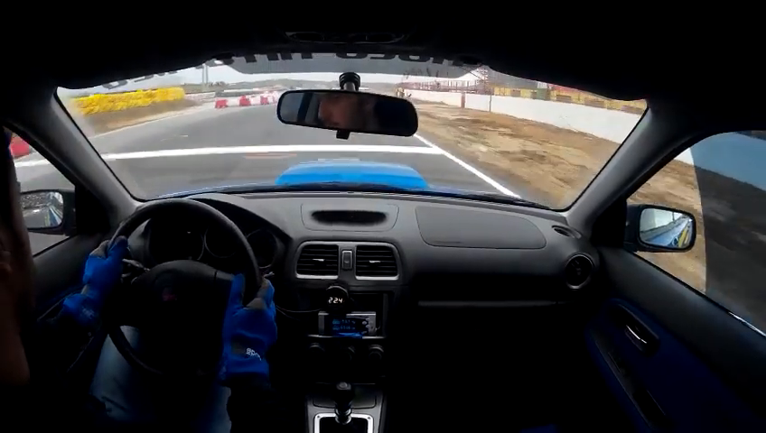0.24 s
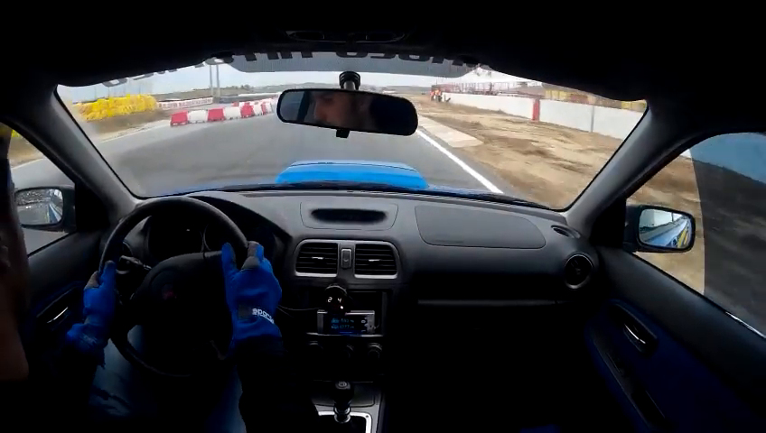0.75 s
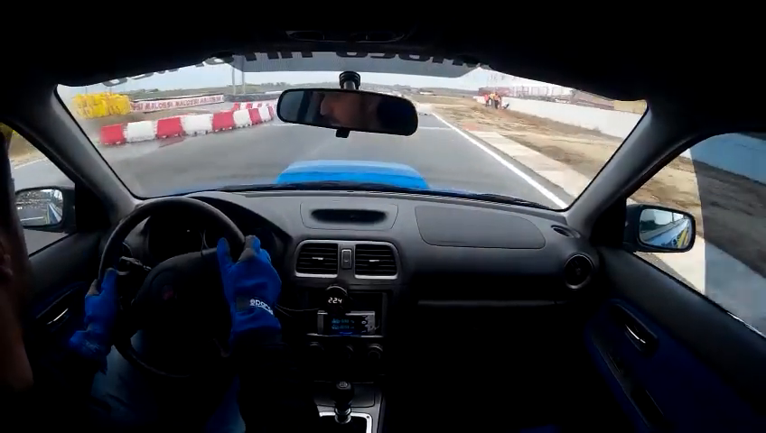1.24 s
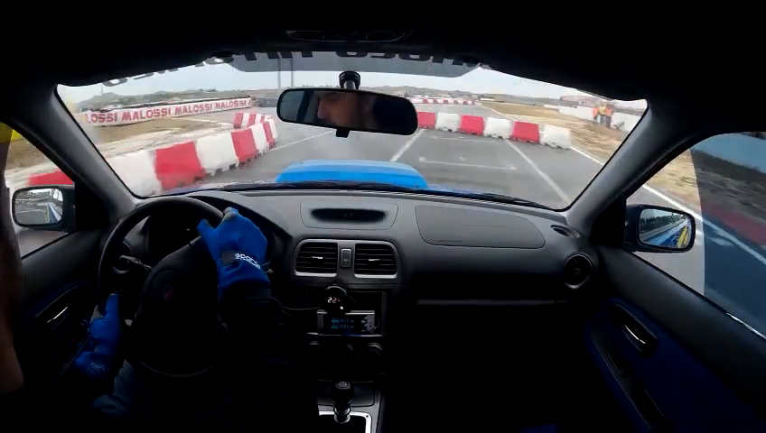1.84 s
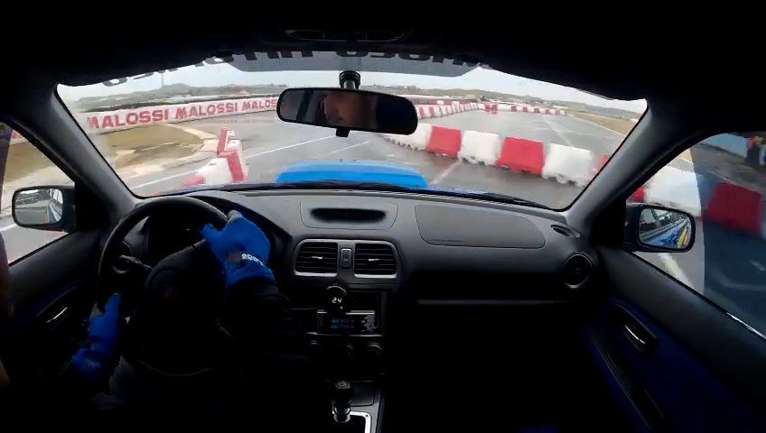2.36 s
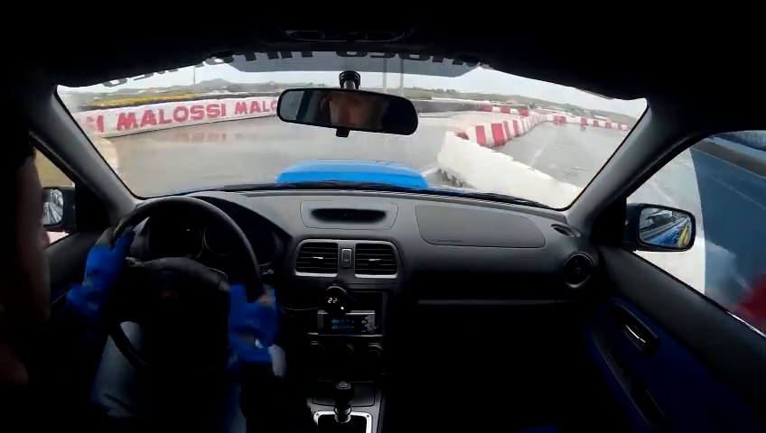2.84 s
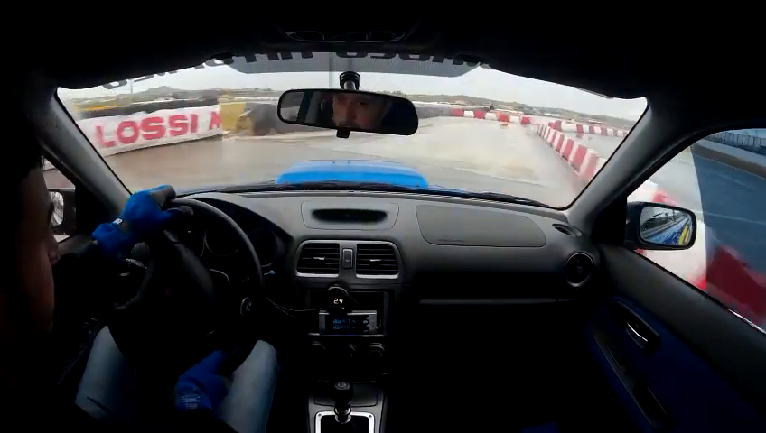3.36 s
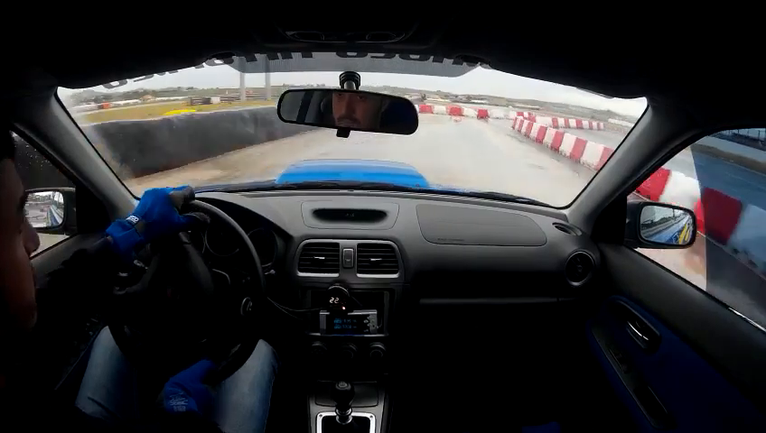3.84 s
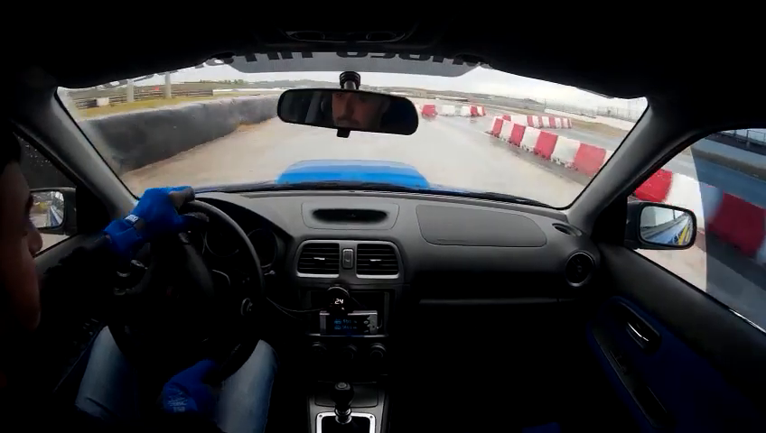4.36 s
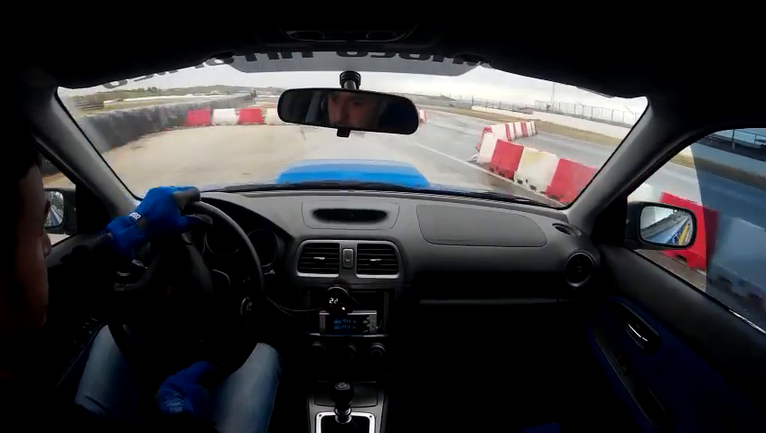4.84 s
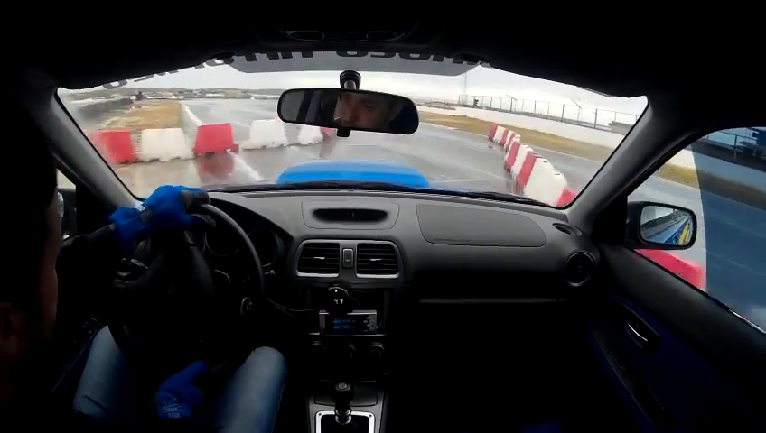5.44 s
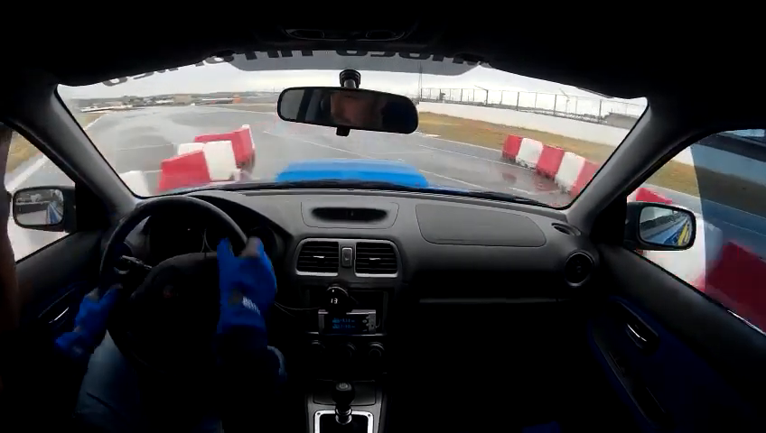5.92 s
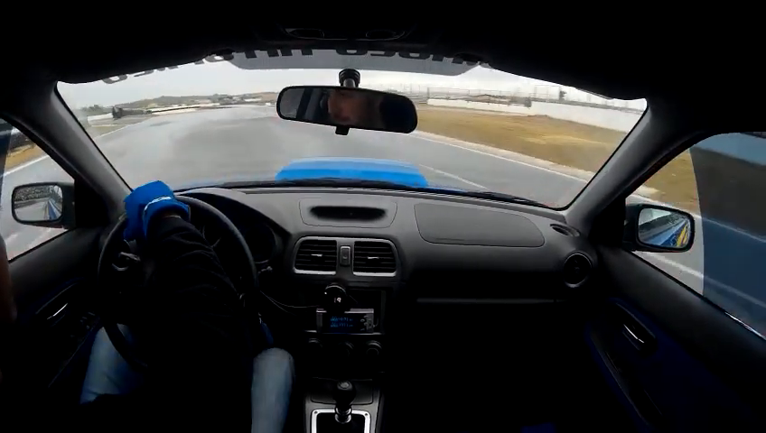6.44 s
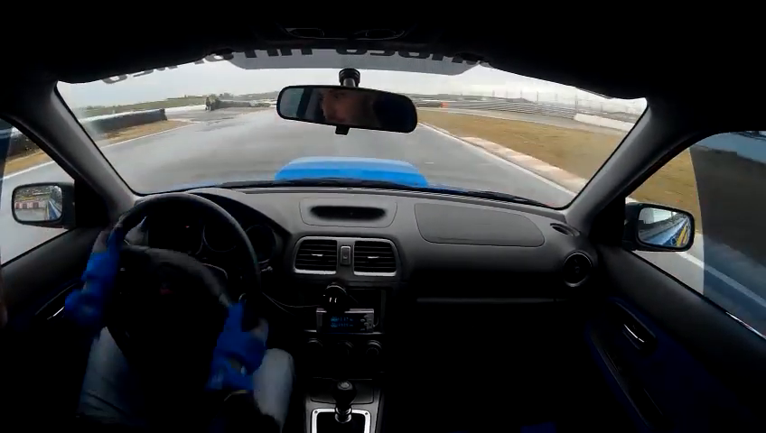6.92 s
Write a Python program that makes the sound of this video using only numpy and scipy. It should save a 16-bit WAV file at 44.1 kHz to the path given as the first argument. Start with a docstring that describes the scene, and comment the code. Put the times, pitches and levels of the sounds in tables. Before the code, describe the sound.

Inside a car on a bumpy track, a throbbing engine eases off and accelerates again amid deep road rumble and clacking trim.

```python
"""Inside a flat-four rally car on a wet road. It starts on the throttle, the exhaust booming in the
cabin over tyre rumble, then lifts off and the revs sink while bumps knock the loose trim.
Around 4 s the roughest stretch sets the trim chattering and grit ticks against the body.
After 5 s the car pulls away, the engine growls as the throttle opens, and near 7 s puddles
spray the wheel arches."""
import sys
import numpy as np
from scipy import signal
from scipy.fft import rfft, irfft, next_fast_len
from scipy.io import wavfile
from scipy.ndimage import uniform_filter1d, map_coordinates

SR = 44100
rng = np.random.default_rng(int(sys.argv[2]) if len(sys.argv) > 2 else 0)


def int16_out(signal):
    """Quantize to a 16-bit WAV file."""
    q = np.round(np.clip(np.atleast_2d(signal).T, -1, 1) * 32767)
    wavfile.write(sys.argv[1], SR, q.astype(np.int16))


N = 316638


def amp(db):
    """Decibels to gain."""
    return np.exp(np.asarray(db) * (np.log(10) / 20))


def unit(x):
    """Scale to rms 1."""
    return x / np.sqrt(np.mean(x ** 2) + 1e-20)


def automation(rows):
    """Draw (t/s, value) breakpoints as one value per sample."""
    return np.interp(np.arange(N) / SR, *np.transpose(rows))


def along(points, hz):
    """Read (f/Hz, value) points on a log frequency axis."""
    f, value = np.transpose(points)
    return np.interp(np.log(hz), np.log(f), value)


def swell(s, half_s):
    """A bell-shaped envelope of height 1 around a moment."""
    return np.exp(-((np.arange(N) / SR - s) / half_s) ** 2)


def wobble(rate):
    """Smooth random modulation, rate knots a second."""
    knots = rng.standard_normal(int(N * rate / SR) + 4)
    coarse = np.arange(0, N + 20, 20)
    smooth = map_coordinates(knots, [coarse * rate / SR])
    return np.interp(np.arange(N), coarse, smooth)


def response(points, size):
    """Minimum-phase impulse response of an EQ curve of (f/Hz, level/dB) points."""
    gain = amp(along(points, np.fft.rfftfreq(size, 1 / SR) + 1))
    cepstrum = irfft(np.log(gain))
    cepstrum[1:size // 2] *= 2
    cepstrum[size // 2 + 1:] = 0
    return irfft(np.exp(rfft(cepstrum)))


def colour(x, points):
    """Pass a sound through a body with this EQ curve."""
    return signal.oaconvolve(x, response(points, size=16384))[:len(x)]


def noise(points):
    """Coloured noise of rms 1."""
    return unit(colour(rng.standard_normal(N), points))


def even(x, seconds):
    """Level out the slow swells of a noise and keep its fast flutter."""
    power = np.abs(uniform_filter1d(x ** 2, int(seconds * SR / 2) + 1))
    return unit(x / np.sqrt(uniform_filter1d(power, int(seconds * SR) + 1) + 1e-9))


def add(track, s, sound):
    """Mix a sound in at a time."""
    part = track[max(round(s * SR), 0):][:len(sound)]
    part += sound[:len(part)]


def contact(points, scrape, t60):
    """A hit that scrapes in and out of touch, coloured by what is struck; peak 1."""
    t = np.arange(SR // 20) / SR
    force = scrape * rng.standard_normal(len(t)) * amp(-60 * t / t60) * (1 - np.exp(-t / .0012))
    force[round(.0008 * SR)] += 1  # the main transient
    ring = signal.fftconvolve(force, response(points, size=2048))
    return ring / np.abs(ring).max()


# roughness of the ride: t/s, level/dB
ROUGHNESS = [(0, 8), (.35, -6), (.8, -6.5), (1.5, -7), (2.2, -8), (2.8, -10.5), (3.2, -9.5), (3.45, -5),
             (3.65, -2.5), (4.45, 3), (4.75, -1), (5.55, -1), (5.97, -10.5), (6.25, 0.5), (6.65, -2),
             (7.18, 4)]
# bumps under the wheels: t/s, floor drum swell/dB, rumble swell/dB, body shake swell/dB
BUMPS = [(.04, -10, 0.5, -1), (.15, 2, -11, 8), (.6, -10, 7.5, 10), (.98, 12, 0, 3.5), (1.78, 9.5, 0, -2),
         (2.03, 9.5, -0.5, -0.5), (2.22, 9, 0.5, -4), (3.94, 5.5, 3, 5), (4.26, 8, -6, -3),
         (4.48, 3, 6, 1.5), (4.92, 6.5, 1.5, -2.5), (5.34, 1, 2, 3.5), (5.69, 8, 2.5, -0.5),
         (6.45, 5.5, -7, -1), (6.8, 3.5, 9.5, -2.5), (7.019, 4.5, -3.5, -6)]
def ride():
    """The road surface as level rides in dB: its roughness, and three lanes of swells from the bumps."""
    bumps_db = sum(np.outer(swell_db, swell(s, half_s=.075)) for s, *swell_db in BUMPS)
    return automation(ROUGHNESS), bumps_db


# EQ of the floor drum, cabin rumble, higher air modes and body shake: f/Hz, level/dB
FLOOR_EQ = [(15, -39), (35, -16.5), (54, -17.5), (67, -5.5), (79, 2.5), (90, -3.5), (110, -23.5),
            (160, -31), (250, -43.5), (900, -110)]
RUMBLE_EQ = [(30, -48), (70, -23.5), (85, -3.5), (95, 2), (110, 3), (127, -1.5), (147, -14), (190, -28),
             (250, -37.5), (900, -110)]
AIR_EQ = [(110, -42.5), (150, -10), (169, 3.5), (187, -7.5), (207, 1), (225, -8), (250, -21), (330, -44.5),
          (900, -100)]
SHAKE_EQ = [(8, -25), (17, -7), (24, 0), (31, -12), (50, -25), (200, -100)]
def road(ride_db, bumps_db):
    """The low bed: tyres drum the floor and drive the cabin's air; the body shakes on its springs."""
    drum_db, rumble_db, shake_db = ride_db + bumps_db
    drum = amp(-30 + drum_db) * even(noise(FLOOR_EQ), seconds=.13)
    rumble = amp(-28 + rumble_db) * even(noise(RUMBLE_EQ), seconds=.1)
    air = amp(-41.5 + .56 * rumble_db) * even(noise(AIR_EQ), seconds=.25)  # swells less than the rumble
    shake = amp(-41.5 + shake_db) * even(noise(SHAKE_EQ), seconds=.32)
    return drum + rumble + air + shake


# puddle cues: t/s, length/s, level/dB
PUDDLES = [(6.775, .045, -71), (6.816, .075, -53), (7.078, .04, -67), (7.106, .044, -57)]
# EQ of water on the wheel arches: f/Hz, level/dB
WATER_EQ = [(900, -20.5), (1700, 7.5), (2400, -3), (3200, -1), (4200, -2), (5200, -9), (6500, -9.5),
            (8300, -19.5), (9500, -27), (12000, -27), (15000, -46)]
def spray(gain_db=1.5, attack_s=.014, t60=.06):
    """Each puddle throws a short burst of clumped drops into the wheel arches."""
    t = np.arange(N) / SR
    bursts = np.zeros(N)
    for s, length, db in PUDDLES:
        attack = np.clip((t - s) / attack_s, 0, 1)
        release_db = -60 * np.maximum(t - s - length, 0) / t60
        bursts += attack * amp(db + release_db)
    clumps = amp(4.5 * wobble(600))
    return amp(gain_db) * bursts * unit(noise(WATER_EQ) * clumps)


# stone hits: t/s, level/dB
STONES = [(4.0288, -58.5), (4.0784, -48.5), (4.309, -56), (4.3334, -54.5), (4.345, -51.5), (4.3581, -53.5),
          (4.4703, -50), (5.989, -48)]
# EQ of a stone's tick: f/Hz, level/dB
TICK_EQ = [(500, -14.5), (1000, -0.5), (1700, 11), (2300, 1.5), (2900, 2.5), (4200, -1.5), (5300, -7.5),
           (6500, -10.5), (8500, -16.5), (13000, -37)]
def grit(gain_db=6):
    """Small stones tick against the body."""
    out = np.zeros(N)
    for s, db in STONES:
        add(out, s - .0008, amp(db + gain_db) * contact(TICK_EQ, scrape=.95, t60=.018))
    return out


# modes of the panel behind the trim: f/Hz, level/dB, t60/s
PANEL_MODES = [(238, 12.5, 0.015), (346, 5, 0.028), (434, -1, 0.068), (514, 1, 0.06), (567, 1.5, 0.054),
               (863, -12, 0.1)]
def panel_thud(attack_s=.0015):
    """The heavy panel takes a moment to get moving, then rings out in its damped modes."""
    t = np.arange(SR // 10) / SR
    ring = 0
    for hz, db, t60 in PANEL_MODES:
        decay = amp(db + rng.normal(0, .74) - 60 * t / t60)
        ring += decay * np.sin(2 * np.pi * (hz * t + rng.random()))
    return ring * (1 - np.exp(-(t / attack_s) ** 2))


# trim knocks: t/s, clack level/dB, thud level/dB
KNOCKS = [(0.094, -49.5, -52), (0.1419, -46, -41), (.172, -53, -39.5), (0.599, -37, -36.5),
          (0.8589, -47.5, -41), (0.9602, -49.5, -38), (.9865, -46, -43.5), (1.0324, -44.5, -41),
          (2.0473, -49, -33.5), (2.8556, -47, -52), (2.888, -55, -53.5), (3.0655, -48.5, -47),
          (3.0797, -50.5, -41.5), (3.8158, -53, -42), (3.8251, -33, -35.5), (3.901, -41, -39.5),
          (4.0033, -44.5, -39), (4.0289, -37.5, -39.5), (4.0568, -49, -40.5), (4.15, -33, -33),
          (4.157, -37.5, -47), (4.1742, -46, -38), (4.1907, -43, -39), (4.2103, -34, -36.5),
          (4.2744, -44.5, -42), (4.2864, -41.5, -34), (4.3189, -40.5, -40), (4.337, -45, -42.5),
          (4.3875, -46, -53), (4.4176, -41, -35.5), (4.4323, -26, -27), (4.4669, -37.5, -38),
          (4.4845, -28, -28), (4.5298, -43, -39.5), (4.7119, -43.5, -35.5), (4.7813, -44.5, -39.5),
          (4.998, -38, -33), (5.4118, -48, -48), (6.0828, -50, -49), (6.782, -42.5, -30.5)]
def trim_hits(rebound_over_db=-32, rebound_s=.014, loss_db=7.5, chatter_per_s=34):
    """Cue list for the trim: knocks, rebounds of the hard ones, and chatter on the roughest stretch."""
    rebounds = [(s + rebound_s, db - loss_db, thud_db - loss_db)
                for s, db, thud_db in KNOCKS if db > rebound_over_db]
    chatter = []
    for s in np.arange(3.8, 4.7, 1 / chatter_per_s):
        late, accent = rng.standard_normal(2)
        chatter.append((s + late / chatter_per_s / 2, -50.5 + 1.4 * accent, -47 + 1.4 * accent))
    return KNOCKS + rebounds + chatter


# EQ of the trim's clack: f/Hz, hard-hit level/dB, soft-hit level/dB
TRIM_EQ = [(250, -16.5, -13.5), (526, -16.5, -6.5), (705, -31, -19.5), (820, -29, -3), (996, -26, -19.5),
           (1170, -9.5, 1), (1350, -15.5, -6.5), (1615, 3, -1.5), (1580, 4, 0.5), (1770, 5.5, 2),
           (2080, -20, -19), (2430, -24.5, -26), (2800, -23, -28.5), (3840, -26.5, -30.5),
           (4540, -32.5, -38), (5100, -49, -50.5), (12000, -80, -88.5)]
def loose_trim(soft_db=-44, hard_db=-27):
    """Loose trim clacks and bounces, brighter when hit harder, and the panel behind it thuds."""
    out = np.zeros(N)
    hz, hard_eq, soft_eq = np.transpose(TRIM_EQ)
    for s, db, thud_db in trim_hits():
        hard = np.clip((db - soft_db) / (hard_db - soft_db), 0, 1)
        spot_db = 1.1 * rng.standard_normal(len(hz))  # each hit lands on another spot
        eq = np.c_[hz, hard * hard_eq + (1 - hard) * soft_eq + spot_db]
        add(out, s - .0008, amp(db + 4) * contact(eq, scrape=.61, t60=.02))
        bounce_s = rng.uniform(.0022, .0065)
        add(out, s + bounce_s, amp(db - 7) * contact(eq, scrape=.32, t60=.023))
        add(out, s - .001, amp(thud_db - 3) * panel_thud())
    return out


# the engine's firing rate: t/s, f/Hz
REVS = [(0, 172), (.15, 169), (.29, 186), (.42, 180), (.58, 167), (.72, 166), (1.0, 158), (1.12, 135),
        (1.7, 122.5), (2.9, 116), (3.8, 111), (4.2, 110), (5.1, 100.5), (5.8, 107.5), (6, 111.5),
        (6.55, 132), (6.9, 148.5), (7.18, 152)]
def firings():
    """Firing rate in Hz, and a running count of firings that wavers slightly with the crank speed."""
    rate = automation(REVS)
    return rate, np.cumsum(rate * (1 + .003 * wobble(25))) / SR


# accent of each of the four firings in a cycle: relative gain
CYLINDERS = [2.2, 2.5, 0.25, 1]
def firing_pulses(count, far_delay_s=.0013):
    """One uneven click per firing; one bank's pulses travel down a longer pipe and arrive late."""
    at = np.flatnonzero(np.diff(np.floor(count)))
    pulses = np.zeros(N)
    pulses[at] = np.resize(CYLINDERS, len(at)) * amp(3.5 * rng.standard_normal(len(at)))
    far_bank = np.floor(count) % 4 < 2
    return pulses * ~far_bank + np.roll(pulses * far_bank, round(far_delay_s * SR))


# EQ of the cabin's resonances and of the path through the bulkhead: f/Hz, level/dB
CABIN_EQ = [(170, -27.5), (240, -8), (290, -0.5), (380, 4), (440, 0), (510, 4), (600, -1), (680, -16.5),
            (740, -15), (820, -9.5), (890, -14.5), (980, -28.5), (1200, -53.5), (3000, -110)]
BULKHEAD_EQ = [(850, -42.5), (1030, -14), (1130, -6), (1230, 5), (1370, -7.5), (1520, -1.5), (1650, -2.5),
               (1790, 1.5), (1930, -6.5), (2080, -18.5), (2500, -23.5), (5000, -47.5), (9000, -100)]
def roar(count, throttle, ride_db):
    """Firing pulses and tyre noise roar in the cabin and rasp through the bulkhead."""
    roar_db = -50.5 + 4.5 * throttle ** 2 + .5 * ride_db
    rasp_db = -66 + 7 * throttle ** 2 + .5 * ride_db
    pulse_share = .051 + .22 * throttle
    pulses = firing_pulses(count)

    def through(eq):
        return np.sqrt(pulse_share) * unit(colour(pulses, eq)) + np.sqrt(1 - pulse_share) * noise(eq)
    return amp(roar_db) * through(CABIN_EQ) + amp(rasp_db) * through(BULKHEAD_EQ)


# higher engine orders: multiple of the firing rate, level/dB
ORDERS = [(1.5, 5), (2, -6), (2.5, -7), (3, -3), (3.5, -2.5), (4, -0.5), (4.5, -5), (5, -1), (5.25, -4),
          (5.5, 0.5), (5.75, -3), (6, 6.5), (6.5, -2), (7, -1.5), (8, -0.5), (8.5, -3.5), (9, -4),
          (10, -10), (11, -10), (12, -9.5)]
def growl(count, throttle, coasting_db=-65, throttle_db=20.5):
    """Throttle brings out the higher orders; they flutter and sweep through the cabin's resonances."""
    orders = 0
    for multiple, db in ORDERS:
        flutter_db = 3.2 * wobble(35)
        phase = 2 * np.pi * (multiple * count + rng.random()) + 1.05 * wobble(45)
        orders += amp(db + flutter_db) * np.sin(phase)
    inside = colour(orders, CABIN_EQ) + amp(-9.5) * colour(orders, BULKHEAD_EQ)
    return amp(coasting_db + throttle_db * throttle) * unit(inside)


# how the cabin's standing waves favour an exhaust note: f/Hz, level/dB
BOOM_EQ = [(100, -32), (105, -27), (110, -33.5), (113.3, -27.5), (115, -25), (117, -30), (118.5, -33.5),
           (123, -32.5), (135, -39), (150, -48), (160, -30.5), (168, -28), (185, -34.5), (200, -47),
           (207, -40.5), (215, -39.5), (222, -55.5), (245, -67.5), (295, -61), (330, -74)]
# brief dips in the exhaust's fundamental: t/s, half width/s, depth/dB
DIPS = [(.19, 0.092, 12), (.83, 0.13, 17.5), (1.1, 0.037, 3), (1.575, 0.09, 3), (3.53, 0.057, 4.5),
        (4.33, 0.13, 13), (4.716, 0.088, 1.5), (6.65, 0.044, 11)]
def exhaust(rate, count, throttle):
    """The firing note and its octave boom as they cross the cabin's standing waves."""
    phase = 2 * np.pi * count
    cycle = phase / 4
    throb = 1 + .073 * np.sin(cycle) + .05 * np.sin(2 * cycle)  # from the unequal header pipes
    waver_db = .6 * wobble(14)
    dip_db = sum(depth_db * swell(s, half_s) for s, half_s, depth_db in DIPS)
    boom = amp(along(BOOM_EQ, rate) - dip_db) * np.sin(phase)
    octave = amp(along(BOOM_EQ, 2 * rate) - 4 + 10.5 * throttle) * np.sin(2 * phase)
    return np.sqrt(2) * throb * amp(waver_db) * (boom + octave)


# the throttle pedal: t/s, opening/0-1
THROTTLE = [(0, 0.65), (1.1, 0), (3.1, 0.13), (4.2, 0.01), (5.5, .3), (5.95, 0.43), (6.3, .65), (6.7, 0.99),
            (7.18, 1)]
def scene():
    """The mono mix between the seats, driven by revs, throttle and the roughness of the ride."""
    rate, count = firings()
    throttle = automation(THROTTLE)
    ride_db, bumps_db = ride()
    surge = amp(.29 * bumps_db[1])  # the roar follows the bumps' rumble lane
    engine = exhaust(rate, count, throttle) + growl(count, throttle)
    engine += surge * roar(count, throttle, ride_db)
    return (road(ride_db, bumps_db) + spray() + grit() + loose_trim() + engine)[None]


# EQ of the noise floor: f/Hz, level/dB
HISS_EQ = [(1000, -12), (2400, 1.5), (4000, 0.5), (7000, 0), (13000, 0), (14800, -1), (15700, -5)]
def record(dry, hiss_db=-74, top_hz=15720):
    """A faint steady hiss goes under the mix, then a brick-wall low-pass cuts the top."""
    size = next_fast_len(N + SR // 2)
    spectrum = rfft(dry + amp(hiss_db) * noise(HISS_EQ), size)
    passband = np.fft.rfftfreq(size, 1 / SR) < top_hz
    return irfft(spectrum * passband, size)[:, :N]


dry = scene()
out = record(dry)
int16_out(out)
```